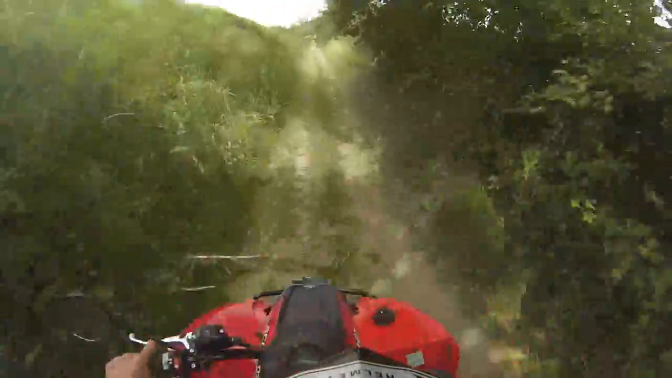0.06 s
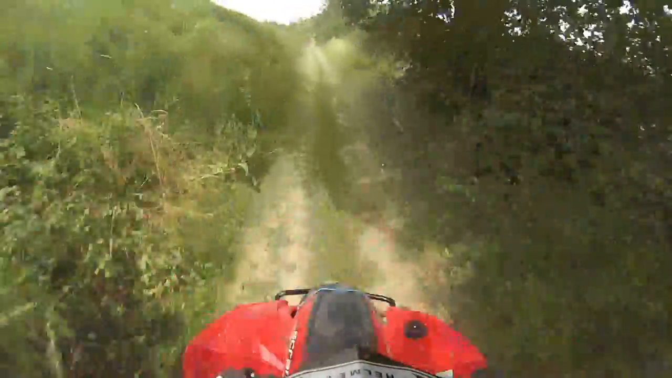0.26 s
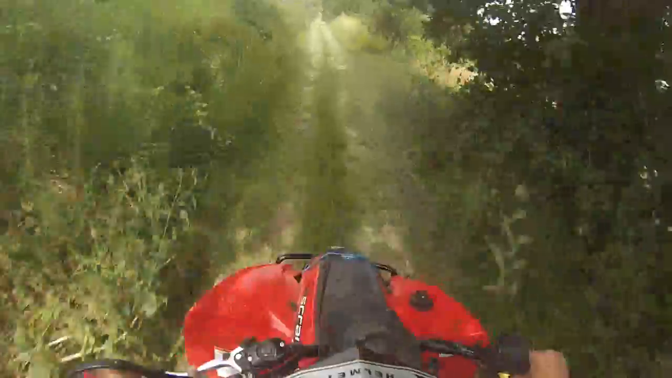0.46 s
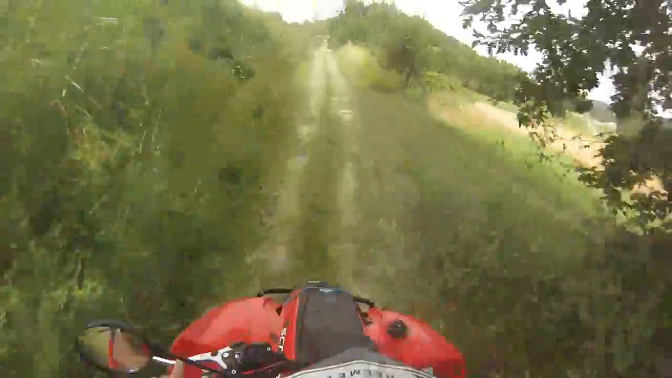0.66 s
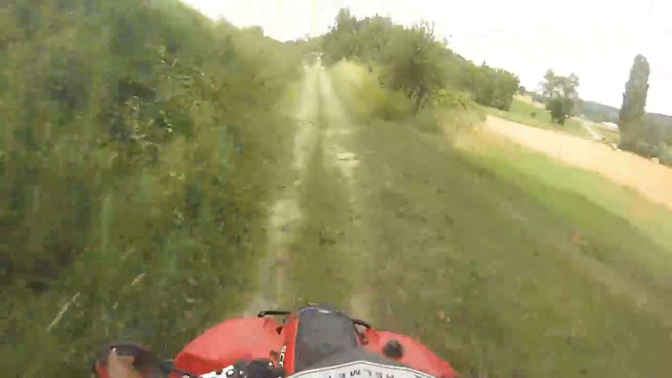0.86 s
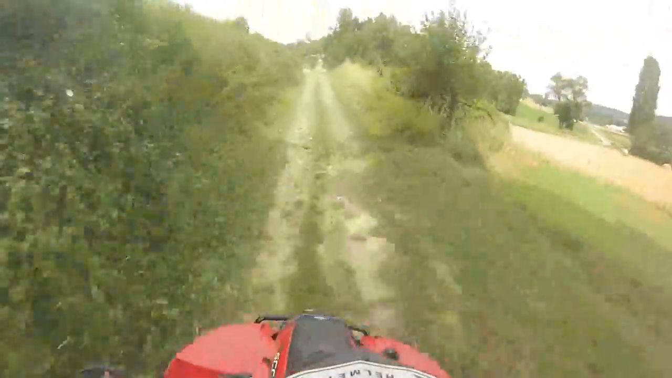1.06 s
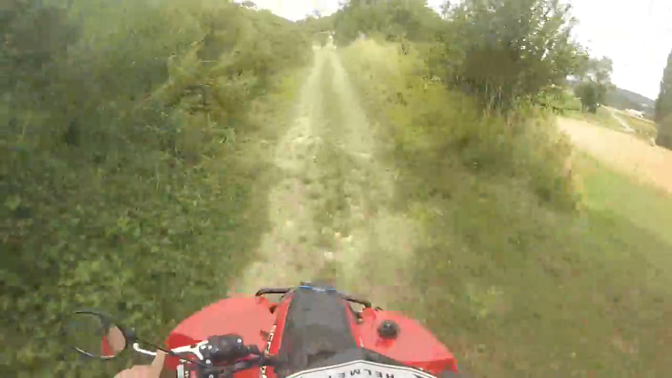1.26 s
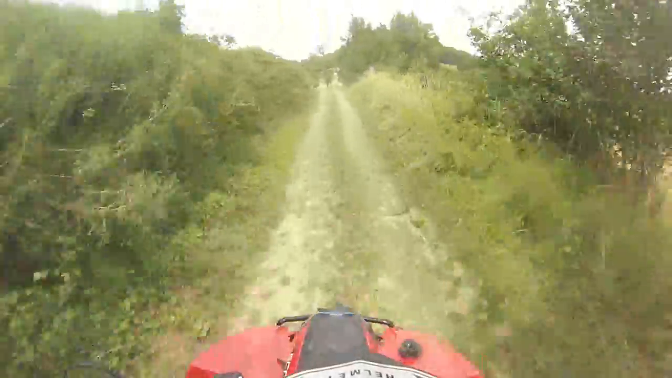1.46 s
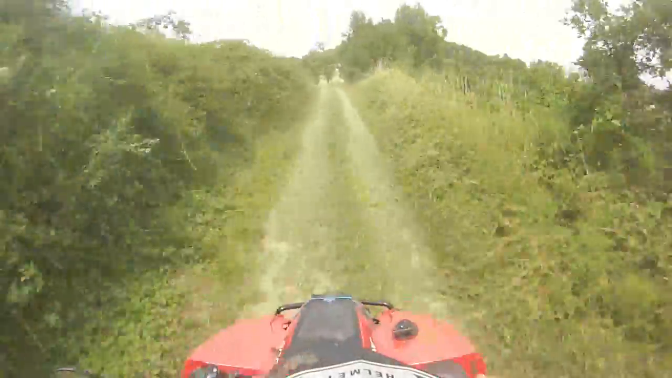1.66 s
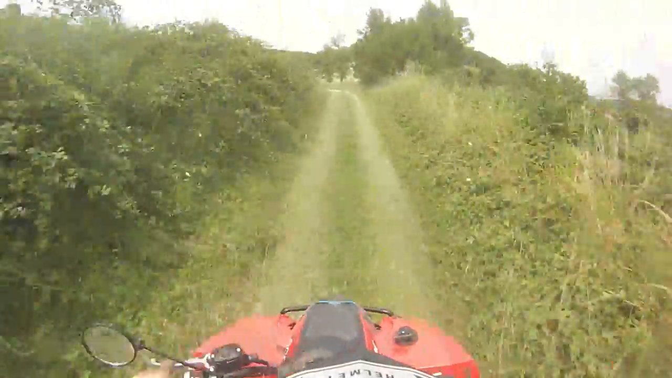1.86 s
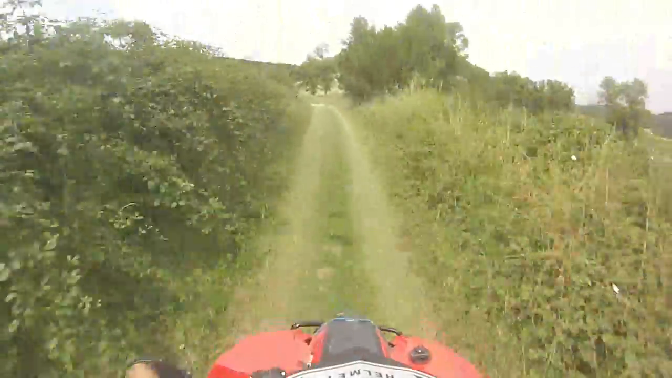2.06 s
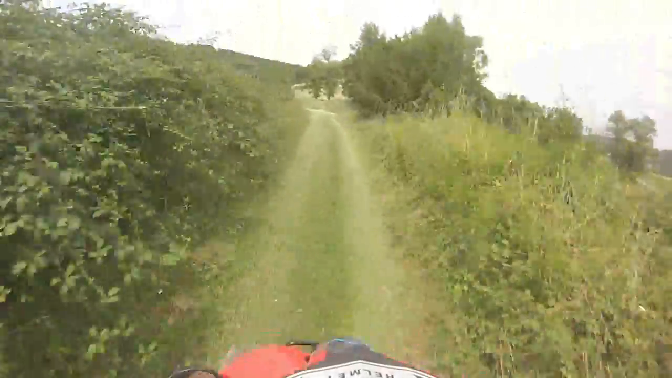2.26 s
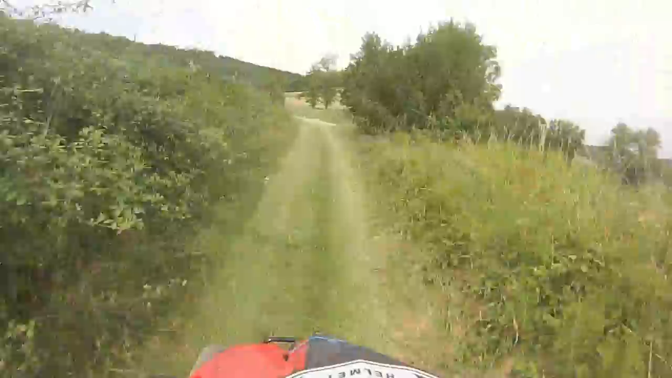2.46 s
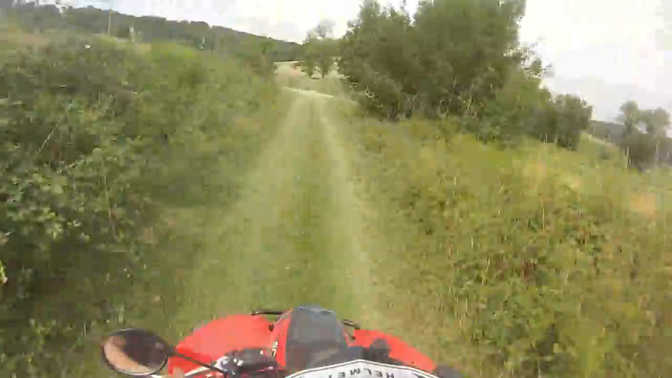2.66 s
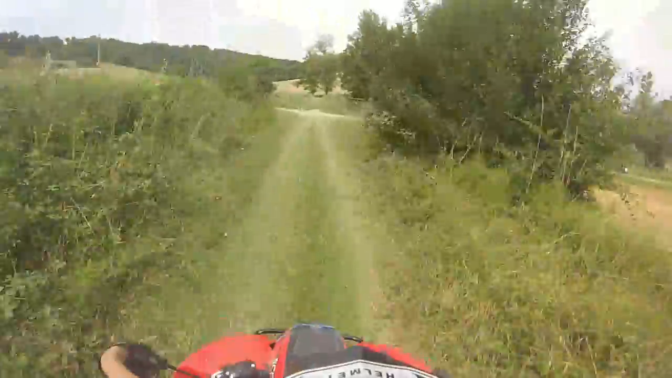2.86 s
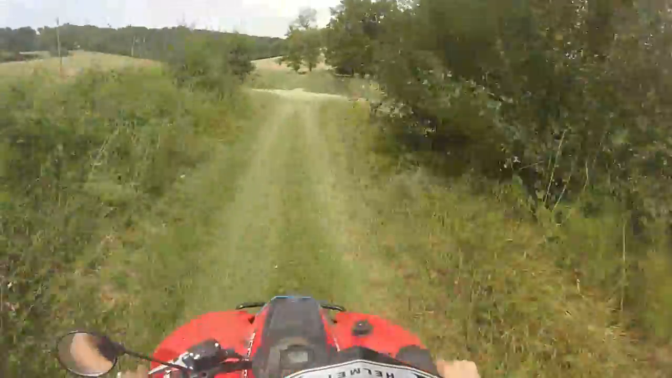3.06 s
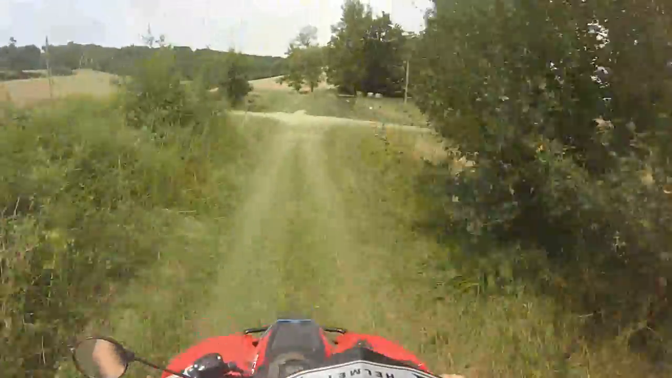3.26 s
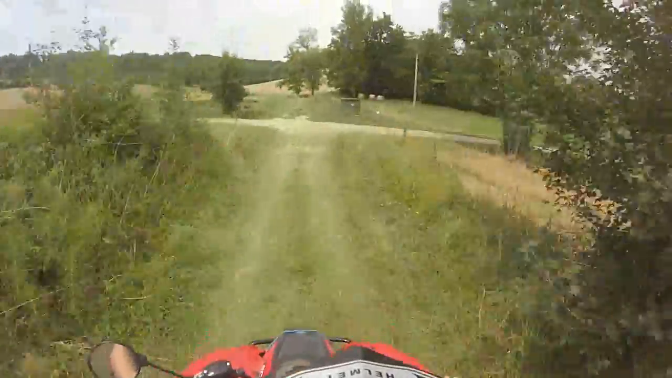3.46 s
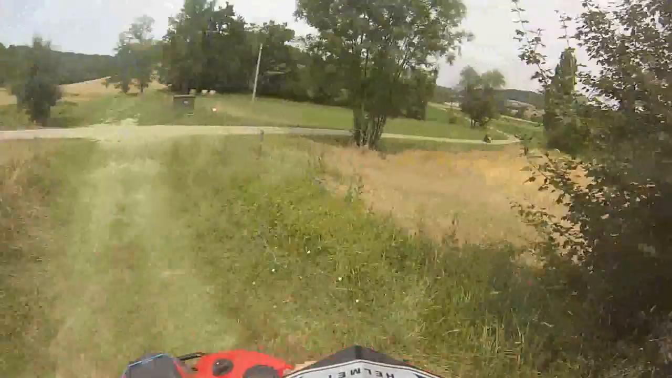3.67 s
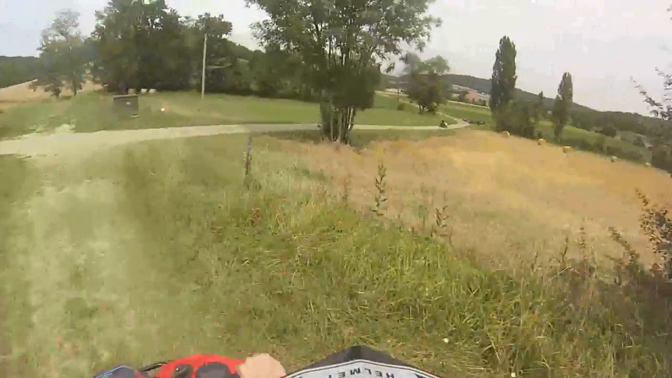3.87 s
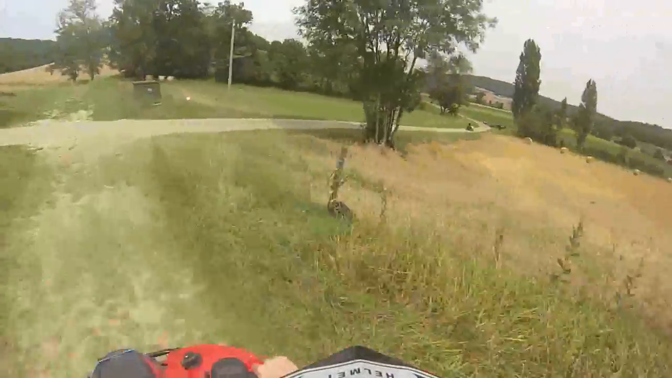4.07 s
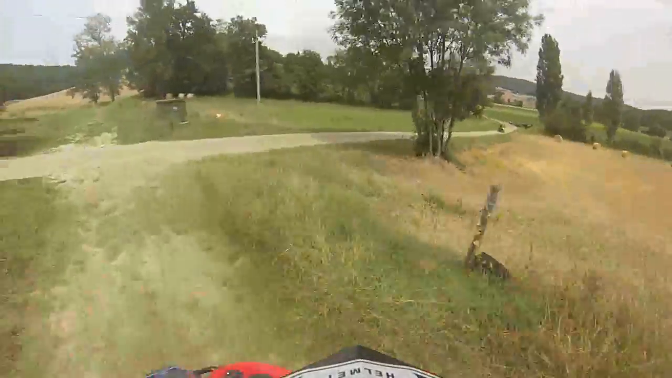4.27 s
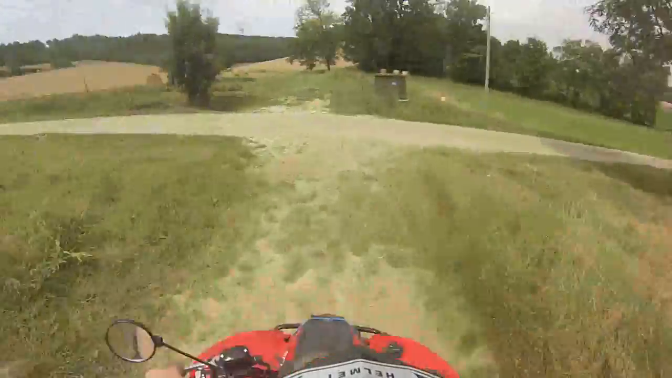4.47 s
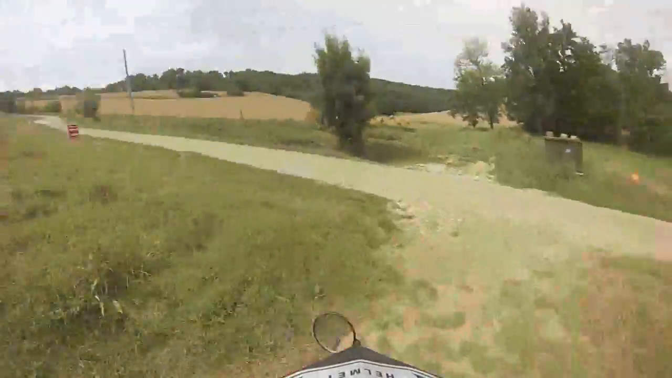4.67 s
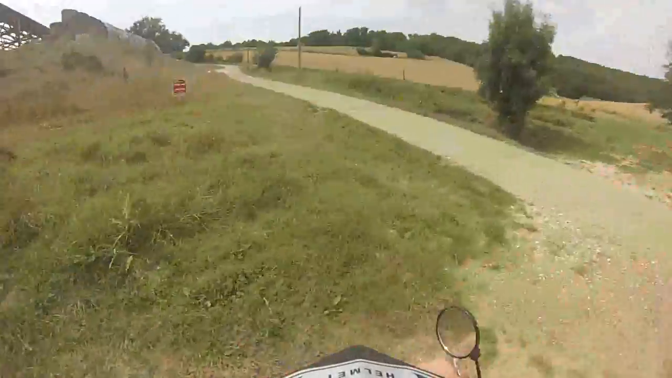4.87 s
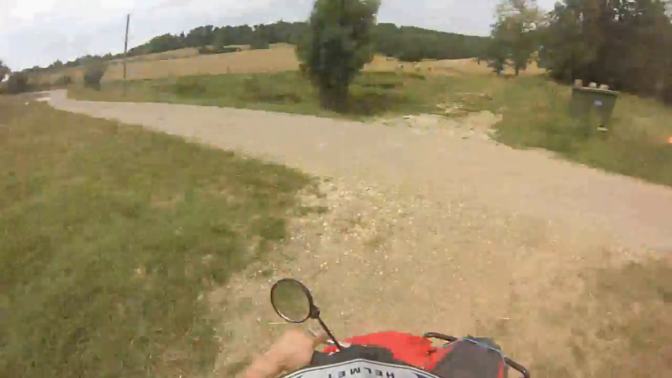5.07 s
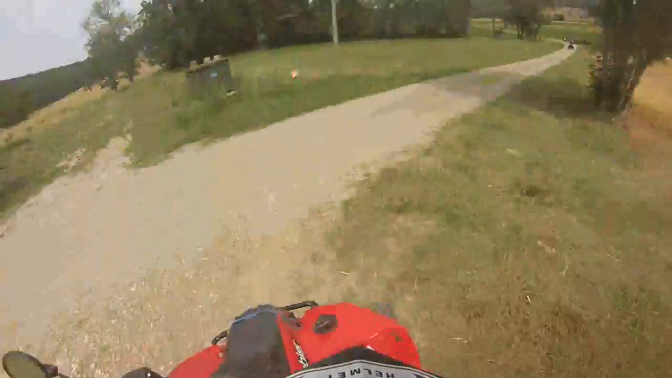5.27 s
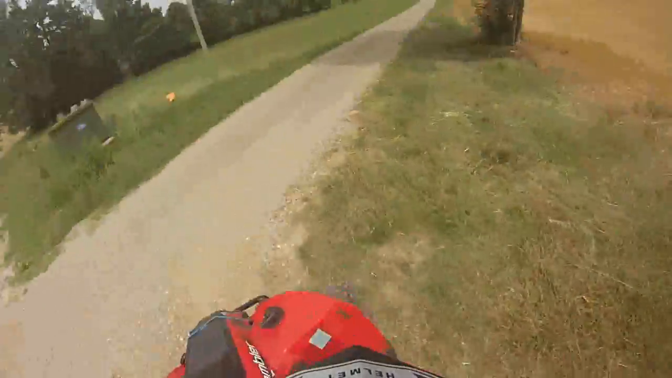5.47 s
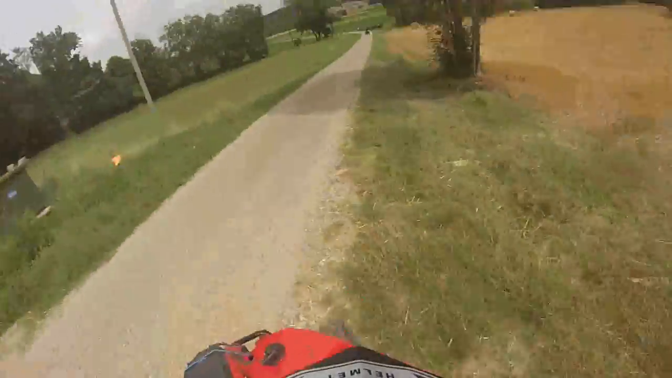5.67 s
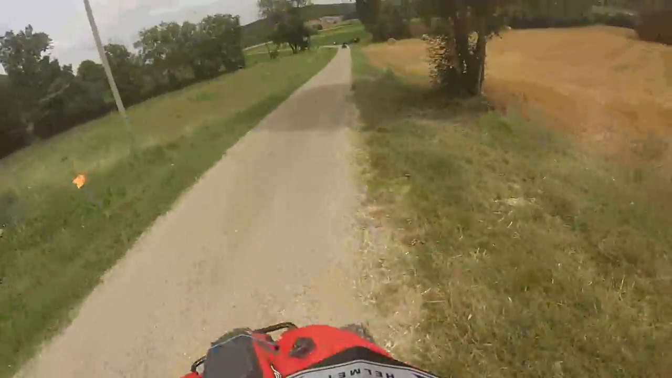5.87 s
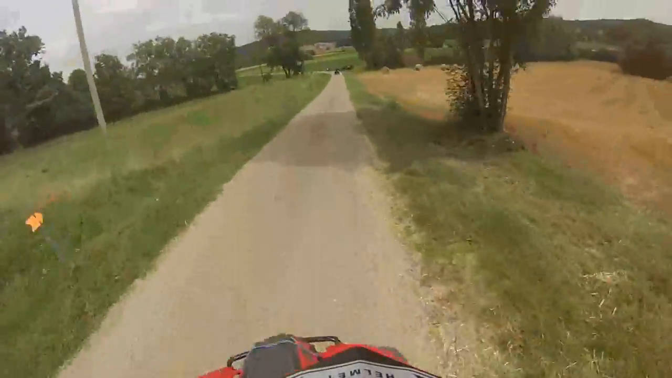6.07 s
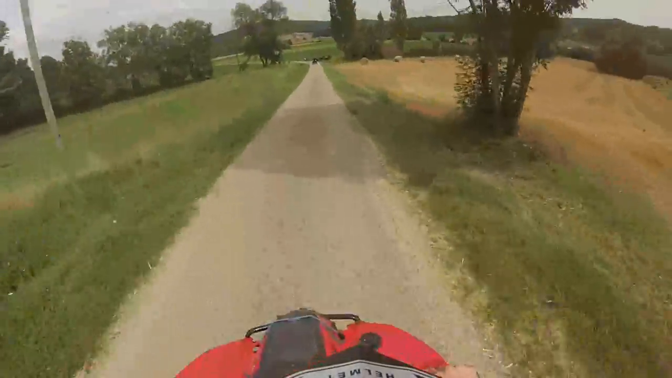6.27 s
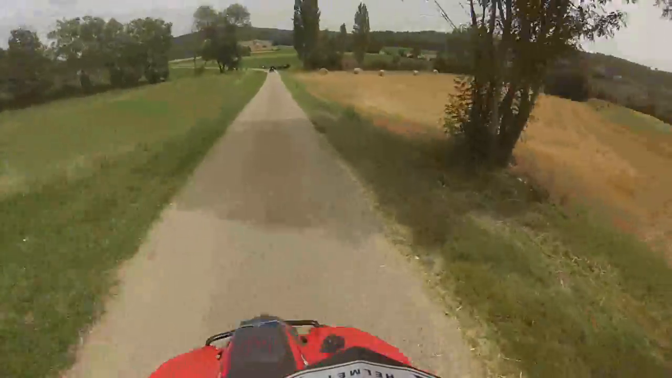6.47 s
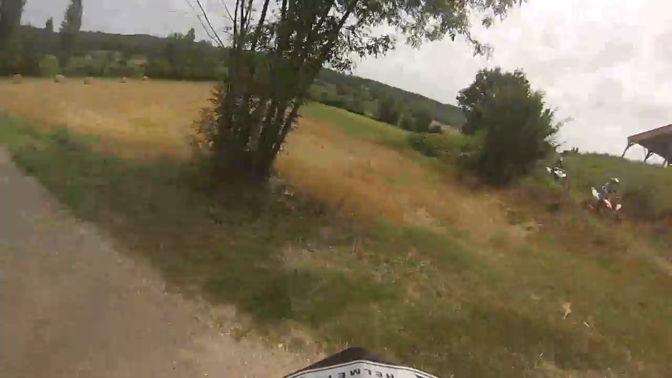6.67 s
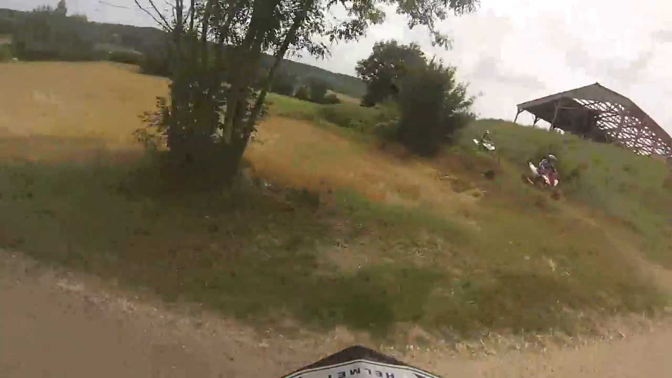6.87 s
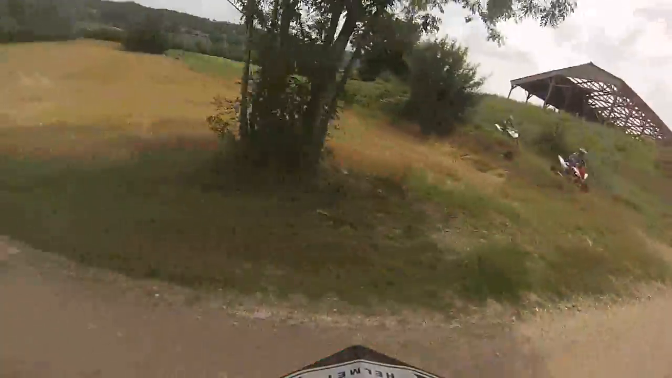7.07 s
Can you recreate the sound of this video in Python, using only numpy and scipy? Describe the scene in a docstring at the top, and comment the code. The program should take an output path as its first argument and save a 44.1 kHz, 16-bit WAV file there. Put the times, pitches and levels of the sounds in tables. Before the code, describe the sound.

A helmet microphone sits close above a single-cylinder four-stroke quad in the open air. From 0 to 1.7 s the engine pulls steadily at high revs: a thick low throb, raspy chuffing, metallic clatter and faint gear whine, over the bright swish of tyres through grass, wind buffets and chassis rumble. From about 1.8 s the revs fall, and by 3 s the rush is softer and duller. It coasts on, the pulses slowing, with dull bumps near 3.8-3.9 s. At 4.64 s one sharp, hard plastic click stands out, followed by low wind thumps and tiny grit ticks. Almost idling at 5.25 s, the engine suddenly barks and the revs climb, with ringing metal, gear growl and pulsing hiss. By 6.2 s it pulls strongly again, a hollow intake honk swelling around 6.4 s, and it holds fairly steady to the end at 7.1 s.

```python
"""Grassy trail and lane, from the helmet of a rider on a single-cylinder four-stroke quad. It pulls along,
coasts down almost to idle at a junction and accelerates onto the lane. Firing orders and chuffs make
the exhaust, blows ringing metal modes the clatter and cover, gear multiples the whine, shaped noise the
tyres, wind and chassis, and filtered impulses the ruts, the grit and one hard click on the camera housing."""
import sys
import numpy as np
from scipy import signal
from scipy.fft import rfft, irfft, next_fast_len
from scipy.io import wavfile
from scipy.ndimage import map_coordinates

SR = 44100
rng = np.random.default_rng(int(sys.argv[2]) if len(sys.argv) > 2 else 0)


def materialize(psi):
    """Save the field psi as 16-bit PCM at rate SR to the path in sys.argv[1].

    A 1-D psi becomes a single channel; in a 2-D psi each row is a channel.
    """
    bounded = np.clip(np.atleast_2d(psi).T, -1, 1)
    quanta = np.round(bounded * 32767).astype(np.int16)
    wavfile.write(sys.argv[1], SR, quanta)


N = 313992

# Rush of the ride. Each row: time in seconds, base treble level in dB.
RUSH_LEVEL = [(0.0, -64), (0.44, -62), (1.23, -62.5), (1.49, -60.5), (2.38, -64.5), (3.01, -71.5),
              (3.19, -75), (3.49, -77.5), (3.96, -84), (4.96, -89.5), (5.28, -85), (5.37, -77),
              (5.51, -75.5), (5.63, -74.5), (5.95, -69), (6.09, -70), (6.74, -71), (7.12, -68.5)]
# Ground under the wheels. Each row: time in seconds, share of bare ground rather than grass (0-1).
BARE_GROUND = [(3.5, 0.02), (5.4, 0.76)]
CRUISE_RATE = 50  # firings per second at cruising speed
METAL_TOP_HZ = 5200  # the engine's metal parts ring little above this


def amp(db):
    """Decibels to gain."""
    return 10 ** (np.asarray(db) / 20)


def unit(x):
    """x at rms 1."""
    return x / np.sqrt(np.mean(x ** 2) + 1e-20)


def curves(rows):
    """One value per sample for each column after the time."""
    s, *cols = np.transpose(rows)
    return [np.interp(np.arange(N) / SR, s, c) for c in cols]


def wobble(rate):
    """A smooth random curve, rate knots a second."""
    knots = rng.standard_normal(int(N * rate / SR) + 4)
    return map_coordinates(knots, [np.arange(N) * rate / SR])


def swells(rows):
    """Decibels gained in bell-shaped (seconds, half length in seconds, dB) swells."""
    t = np.arange(N) / SR
    return sum(db * np.exp(-((t - s) / half) ** 2) for s, half, db in rows)


def noise():
    """White noise."""
    return rng.standard_normal(N)


def blend(a, b, share):
    """Equal-power mix with a share of b."""
    share = np.clip(share, 0, 1)
    return np.sqrt(1 - share) * a + np.sqrt(share) * b


def filtered(x, response):
    """x times a complex response of frequency."""
    m = next_fast_len(N + SR // 2)
    return irfft(rfft(x, m) * response(np.fft.rfftfreq(m, 1 / SR)), m)[:N]


def coloured(x, points):
    """x through a causal filter with the (Hz, dB) shape, at rms 1."""
    size = 16384
    f, db = np.transpose(points)
    hz = np.fft.rfftfreq(size, 1 / SR)
    log_gain = np.log(amp(np.interp(np.log(hz + 1), np.log(f), db)))
    # folding the cepstrum forward in time gives the minimum-phase filter
    cepstrum = irfft(log_gain)[:size // 2]
    cepstrum[1:] *= 2
    impulse_response = irfft(np.exp(rfft(cepstrum, size)))
    return unit(signal.fftconvolve(x, impulse_response)[:N])


def resonances(modes, hz):
    """Complex response of (Hz, width in Hz, dB) modes, alternating in sign."""
    return sum((-1) ** k * amp(db) * 1j * hz * width / (centre * centre - hz * hz + 1j * hz * width)
               for k, (centre, width, db) in enumerate(modes))


def ringing(drive, modes, top_hz):
    """The modes' answer to a drive that is softened above top_hz, at rms 1."""
    return unit(filtered(drive, lambda hz: resonances(modes, hz) / (1 + 1j * hz / top_hz) ** 2))


def rattling(drive, modes):
    """Loose metal: every mode swells and fades on its own, at rms 1."""
    flutter_db, flutter_rate = 3, 18  # depth in dB, knots per second
    parts = (amp(db + flutter_db * wobble(flutter_rate)) * ringing(drive, [(hz, width, 0)], METAL_TOP_HZ)
             for hz, width, db in modes)
    return unit(sum(parts))


def pulses(times, sizes):
    """Impulses placed between samples by a windowed sinc."""
    at = np.clip(np.ravel(times) * SR, 0, N + 1)
    index = at.astype(int)[:, None] + np.arange(-7, 9)
    offset = index - at[:, None]
    taps = np.sinc(offset) * np.sinc(offset / 8) * np.ravel(sizes)[:, None]
    return np.bincount(np.clip(index, 0, N).ravel(), taps.ravel(), N + 1)[:N]


def blows(cycle, angles, scatter_db, jitter):
    """Blows at the same points of every engine cycle, uneven in size and time (jitter in s), at even power."""
    due = np.arange(int(cycle[-1]) + 1)[:, None] + angles
    times = np.interp(due, cycle, np.arange(N) / SR, right=N) + jitter * rng.standard_normal(due.shape)
    signs = rng.choice([-1, 1], len(angles))
    sizes = signs * amp(scatter_db * rng.standard_normal(due.shape))
    # denser blows at high revs are turned down
    return unit(pulses(times, sizes) / np.sqrt(np.gradient(cycle)))


def gas(cycle, depth_db):
    """Noise that swells once in every engine cycle."""
    return unit(noise() * amp(depth_db * np.cos(2 * np.pi * cycle)))


def effort(law, rate, throttle):
    """An engine layer's dB: louder with speed and with throttle."""
    db, per_octave_db, shut_db = law
    return db + per_octave_db * np.log2(rate / CRUISE_RATE) - shut_db * (1 - throttle)


def boom(rate, cycle, throttle, count=20):
    """Firing orders slide through the pipe's fixed tone; its phase lag shapes them into a ringing puff per cycle."""
    # Boom tone under load and coasting. Each row: pitch in Hz, base level in dB of a firing order there.
    pull_tone = [(28, -49), (44, -48.5), (51, -63.5), (70, -49), (90, -48.5), (102, -49), (112, -51.5),
                 (135, -51), (152, -58), (180, -56.5), (200, -61), (222, -69), (237, -54), (253, -53.5),
                 (264, -53.5), (275, -65), (302, -75), (318, -59.5), (355, -64.5), (405, -68), (455, -65),
                 (500, -67.5), (550, -72), (610, -64.5), (650, -69.5), (700, -73), (740, -76), (820, -78.5),
                 (1000, -89)]
    coast_tone = [(30, -67), (55, -63), (75, -61), (90, -59), (105, -48), (118, -47), (131, -51),
                  (140, -62), (150, -73), (170, -76), (400, -76.5), (700, -98)]
    # Turn from coasting to pulling tone. Each row: throttle (0-1), share of the pulling tone (0-1).
    pull_share = [(.5, 0.037), (.85, 0.96)]
    # Coasting, the boom dies away towards idle. Each row: firings per second, dB gained.
    coast_fade = [(19.5, -16.5), (21.2, -11), (22.8, -4.5), (26, -6), (29.5, 0), (40, 5), (44, -0.5)]
    # Ring of the pipe, used for its phase. Each row: pitch in Hz, width in Hz, level in dB.
    pipe_mode = [(129.2, 5.6, 0)]
    # Tone of the pipe's bark, passed twice. Each row: pitch in Hz, width in Hz, level in dB per pass.
    bark_tone = [(133.7, 19, -2)]
    # Uneven firing as the throttle closes. Each row: time in seconds, half length in seconds, added dB of unevenness.
    stumbles = [(1.9, 0.18, 3.5), (2.45, 0.2, 2)]
    # Higher firing orders waver more. Each row: pitch in Hz, depth in dB.
    waver = [(200, 0), (450, 2.2)]
    pull_db_per_octave = 18.5
    smear_hz = 105  # higher orders are delayed more: one radian of lag at this pitch
    # the throttle snaps open and the pipe barks; the level is ahead of the rise and the bark tone
    bark_s, bark_rise_s, bark_db, bark_fade_db_per_s = 5.275, .012, -46, 16

    pull = np.clip(np.interp(throttle, *np.transpose(pull_share)), 0, 1)
    pull_db = pull_db_per_octave * np.log2(rate / CRUISE_RATE)
    idle_db = np.interp(rate, *np.transpose(coast_fade))
    age = np.maximum(np.arange(N) / SR - bark_s, 0)
    bark = amp(bark_db - bark_fade_db_per_s * age) * (1 - np.exp(-age / bark_rise_s))
    unevenness = .25 + .6 * pull + swells(stumbles)
    out = np.zeros(N)
    for k in range(1, count + 1):
        hz = k * rate
        pulling = np.interp(hz, *np.transpose(pull_tone)) + pull_db
        coasting = np.interp(hz, *np.transpose(coast_tone)) + idle_db
        steady = amp(pull * pulling + (1 - pull) * coasting)
        size = np.hypot(steady, bark * np.abs(resonances(bark_tone, hz)) ** 2)
        lag = np.angle(resonances(pipe_mode, hz)) - (hz / smear_hz) ** 2
        uneven_db = unevenness * wobble(22) + np.interp(hz, *np.transpose(waver)) * wobble(9)
        out += size * amp(uneven_db) * np.sqrt(2) * np.cos(2 * np.pi * k * cycle + lag)
    return out


def silencer(hz):
    """Each chamber smears a pulse into echoes without colouring it."""
    # Silencer chambers. Each row: round trip in seconds, reflection (0-1).
    chambers = [(.0023, 0.26), (.0075, 0.6)]
    response = 1
    for trip, reflection in chambers:
        echo = np.exp(-2j * np.pi * hz * trip)
        back = np.clip(reflection, 0, .9)
        response = response * (echo - back) / (1 - back * echo)  # all-pass
    return response


def rasp(cycle, rate, db):
    """Each firing chuffs: an uneven pulse through the silencer and a dying puff of gas, more gas at high revs."""
    # Spectrum of the chuffs. Each row: pitch in Hz, relative level in dB per Hz.
    rasp_tone = [(120, -39.5), (200, 0), (260, 6), (315, 3.5), (360, -0.5), (435, 0), (525, -5.5),
                 (612, -9), (760, -13.5), (1000, -18), (2500, -61)]
    # Chuffs weaken near idle. Each row: firings per second, dB gained.
    chuff_fade = [(19.3, -4), (21, 0.5)]
    puff_s = 0.014  # decay of the gas after each firing
    firing = filtered(blows(cycle, np.zeros(1), scatter_db=1, jitter=.0006), silencer)
    since_firing = (cycle % 1) / rate
    puffs = unit(noise() * np.exp(-since_firing / puff_s))
    idle_db = np.interp(rate, *np.transpose(chuff_fade))
    gassy = np.interp(rate, [25, 45], [.25, .8])
    return amp(db + idle_db) * coloured(blend(firing, puffs, share=gassy), rasp_tone)


def clatter(cycle, throttle, db, fins_db):
    """Valve gear and gear teeth strike all round the cycle; case, gearbox and cooling fins ring along."""
    # Spectrum of the engine body. Each row: pitch in Hz, relative level in dB per Hz.
    engine_tone = [(400, -34.5), (680, -11), (865, -11), (985, -24), (1075, -1.5), (1300, -2.5),
                   (1500, -5.5), (1660, -19), (2170, -19.5), (2330, -4), (2560, -3.5), (2760, -14),
                   (3080, -22), (4100, -24.5), (5500, -67.5)]
    # Modes of case, gearbox growl and fins. Each row: pitch in Hz, width in Hz, relative level in dB.
    case_modes = [(2006, 43, -5), (2983, 37, 2.5), (3273, 33, 3), (3344, 85, 1), (4184, 83, -2.5)]
    growl_modes = [(1115, 58, 1.5), (1298, 102, 3.5), (1350, 50, -2.5)]
    fin_modes = [(2375, 28, 0), (2450, 44, 3), (2546, 60, -2.5)]
    # The case buzzes under load, the gears growl as they take up load, the fins rattle in bursts.
    # Each row: time in seconds, half length in seconds, dB gained.
    buzzes = [(5.6, .2, -1), (6.25, 0.31, 2.5), (6.72, 0.18, 3)]
    growls = [(.25, 0.027, 9), (5.52, 0.056, 9.5), (6.12, 0.17, 10), (6.57, 0.026, 11.5),
              (6.92, 0.21, 11.5)]
    rattles = [(.08, 0.038, 6), (.43, 0.11, 4), (1.19, 0.024, 11.5), (1.68, 0.069, 3), (3.64, 0.038, 16.5),
               (5.33, 0.037, 2), (5.52, 0.08, 5), (5.78, 0.07, 8.5), (5.93, 0.058, 3), (6.16, 0.063, 1),
               (6.75, 0.23, -14)]
    case_db, growl_db = -12, -8.5  # against the engine body, before the swells
    teeth = blows(cycle, rng.random(size=32), scatter_db=4.0, jitter=.00004)
    strikes = blend(teeth, gas(cycle, depth_db=1.5), share=.7 - .42 * throttle)
    body = coloured(strikes, engine_tone)
    case = amp(case_db + swells(buzzes)) * rattling(strikes, case_modes)
    growl = amp(growl_db + swells(growls)) * ringing(strikes, growl_modes, METAL_TOP_HZ)
    fins = amp(fins_db + swells(rattles)) * rattling(strikes, fin_modes)
    return amp(db + 0.78 * wobble(8)) * (body + case + growl) + fins


def cover(cycle, db):
    """Each firing knocks a thin cover, which sings out when a multiple of the firing rate meets its pitch."""
    # Ring of the cover. Each row: pitch in Hz, width in Hz, relative level in dB.
    cover_mode = [(1398.4, 19, 0)]
    # The ring surges. Each row: time in seconds, half length in seconds, dB gained.
    surges = [(.11, 0.026, 4), (.45, 0.044, 2), (1.6, 0.33, 7.5), (5.02, 0.032, 11), (5.47, 0.035, 7),
              (5.58, 0.089, 9.5), (5.72, 0.045, 11), (5.86, 0.021, 7.5), (6.018, .008, 4),
              (6.04, 0.14, 12.5), (6.35, 0.12, 4.5), (6.8, .16, -1), (7.09, 0.079, 7)]
    knock = blows(cycle, np.zeros(1), scatter_db=1.8, jitter=.00007)
    drive = blend(knock, noise(), share=.3)
    return amp(db + swells(surges)) * ringing(drive, cover_mode, METAL_TOP_HZ)


def whine(rate, cycle, db):
    """Meshing gears sing on high multiples of the firing rate; backlash roughens each in strength and phase."""
    # Gear whines. Each row: multiple of the firing rate, relative level in dB ahead of the gearbox.
    gear_multiples = [(19, -6.5), (22, -4.5), (23, -9), (24, 0), (25, -7), (26, -7), (27, -8), (28, -2.5),
                      (29, -7), (30, -14), (31, -9), (33, -4.5), (34, -3)]
    # The gearbox lifts passing whines. Each row: pitch in Hz, width in Hz, level in dB of the added ring.
    gearbox_modes = [(860, 17, 11), (1030, 16, -7)]
    out = np.zeros(N)
    for k, level_db in gear_multiples:
        multiple = round(k)
        lift = 1 + np.abs(resonances(gearbox_modes, multiple * rate))
        backlash = .4 * wobble(45)  # radians
        out += lift * amp(level_db + 1.5 * wobble(7)) * np.sin(2 * np.pi * multiple * cycle + backlash)
    return amp(db) * out


def rush(cycle):
    """Tyres swish through grass, duller as they slow; on bare ground they yield to the engine's pulsing hiss."""
    # Spectra of the grass swish and the hiss. Each row: pitch in Hz, relative level in dB per Hz.
    grass_tone = [(150, -22), (400, 8.5), (800, 3.5), (950, 7), (1150, 11), (1450, 12.5), (1700, 9.5),
                  (1930, 5.5), (2300, 12), (2600, 9.5), (2760, 4), (3120, 0.5), (3340, 3.5), (3560, -.5),
                  (4600, -5), (7000, -4), (8700, -16.5), (10700, -12.5), (14500, -30)]
    hiss_tone = [(1800, 4), (2600, 14.5), (3100, 10), (3370, 5.5), (3750, 4.5), (4300, 9), (4720, 1),
                 (5050, 1.5), (6200, 1.5), (7400, 3.5), (8500, -10.5), (9900, -8.5), (12500, -12),
                 (13500, -50), (15000, -62)]
    # Tall grass brushes the quad. Each row: time in seconds, half length in seconds, dB gained.
    brushes = [(2.95, 0.079, 1), (3.68, 0.085, 2.5)]
    # below this pitch the tyres win back this many dB per dB of lost rush
    dull_hz, dull_grows = 2170, 0.31
    db, = curves(RUSH_LEVEL)
    bare, = curves(BARE_GROUND)
    grass = coloured(noise(), grass_tone)
    low = filtered(grass, lambda hz: 1 / (1 + (hz / dull_hz) ** 4))
    grass = grass + (amp(dull_grows * (db.max() - db)) - 1) * low
    tyres = amp(12.0 + swells(brushes) + 0.41 * wobble(39.94)) * grass
    hiss = amp(4.5) * coloured(gas(cycle, depth_db=3.5), hiss_tone)
    return amp(db) * blend(tyres, hiss, share=bare)


def ride():
    """Wind on the microphone and the chassis rumbling over bumps; both grow with the pace."""
    # Spectra of wind and chassis. Each row: pitch in Hz, relative level in dB per Hz.
    buffet_tone = [(8, -10.5), (20, -2.5), (34, -7), (46, -9), (62, -22), (110, -32.5), (300, -76)]
    chassis_tone = [(40, -35), (70, -7.5), (125, 0.5), (172, 1), (215, -9), (270, -11), (450, -32.5),
                    (1000, -70.5)]
    # Gusts on the microphone, and rough patches that shake the chassis.
    # Each row: time in seconds, half length in seconds, dB gained.
    gusts = [(.29, 0.097, 13.5), (.47, 0.037, 10), (1.8, 0.22, 2), (2.3, 0.07, 5), (4.82, 0.071, 13.5),
             (4.95, 0.063, 11), (5.53, 0.052, 6.5)]
    jolts = [(.6, 0.084, 7), (1.44, 0.13, 6), (1.85, 0.25, 6), (2.68, 0.15, 3.5), (6.37, 0.11, 4),
             (7.04, 0.35, 8)]
    # base dB at full pace, and dB per dB of rush
    wind_base_db, wind_grows = -55, 0.085
    chassis_base_db, chassis_grows = -54, 0.27
    smooth_ground_db = -6.5  # chassis change on fully bare ground
    rush_db, = curves(RUSH_LEVEL)
    bare, = curves(BARE_GROUND)
    pace_db = rush_db - rush_db.max()
    wind_db = wind_base_db + wind_grows * pace_db + swells(gusts) + wobble(7.7)
    chassis_db = chassis_base_db + chassis_grows * pace_db + smooth_ground_db * bare + swells(jolts)
    wind = amp(wind_db) * coloured(noise(), buffet_tone)
    return wind + amp(chassis_db) * coloured(noise(), chassis_tone)


def microphone_hiss():
    """The microphone's steady noise floor, shaped from white noise."""
    # Spectrum of the hiss. Each row: pitch in Hz, relative level in dB per Hz.
    floor_tone = [(1000, -4), (9000, -4), (12500, -6.5), (14000, -33)]
    return amp(-85) * coloured(noise(), floor_tone)


def struck(contacts, modes, low_hz):
    """Contacts ring the modes, soft ones only the lower; a small body radiates little below low_hz."""
    radiation = signal.butter(2, low_hz, "high", fs=SR, output="sos")
    out = np.zeros(N)
    for s, db, top_hz in contacts:
        ring = signal.sosfilt(radiation, ringing(pulses([s], [1]), modes, top_hz))
        out += amp(db) * ring / np.abs(ring).max()
    return out


def knocks():
    """Ruts jolt the rack, a hard contact bounces once on the plastic housing and grit ticks faintly."""
    # Wheels dropping into ruts, contacts on the camera housing, grit against the bodywork.
    # Each row: time in seconds, peak in dB (the housing gets 0.5 dB more), brightness in Hz.
    bumps = [(3.825, -49, 200), (3.915, -53.5, 170), (4.703, -57, 900)]
    clicks = [(4.6355, -21.5, 16000), (4.6363, -29, 9000)]
    ticks = [(4.7765, -68, 6000), (5.1525, -67, 9000), (5.156, -65, 9000)]
    # What rings: front rack, camera housing, grit. Each row: pitch in Hz, width in Hz, relative level in dB.
    rack_modes = [(224, 15, 7.5), (338, 35, -5), (422, 25, 3), (630, 40, 0)]
    housing_modes = [(1420, 150, -6), (2370, 130, 7.5), (3065, 160, 12.5), (3290, 137, 13.5),
                     (3680, 90, 3.5), (4040, 130, -2), (4530, 200, -6), (5040, 140, -11), (5750, 660, -8.5),
                     (7630, 260, -8.5), (9300, 800, -8), (10250, 420, -5.5), (11400, 630, -12)]
    grit_modes = [(5540, 190, -2), (7500, 150, 0), (8130, 190, 0), (9250, 250, -6)]
    rack = struck(bumps, rack_modes, low_hz=200)
    housing = amp(0.5) * struck(clicks, housing_modes, low_hz=1870)
    grit = struck(ticks, grit_modes, low_hz=4000)
    return rack + housing + grit


def intake(cycle):
    """Gulps of air, one per cycle, sound the airbox."""
    # Airbox resonance, passed twice. Each row: pitch in Hz, width in Hz per pass, relative level in dB.
    airbox_mode = [(391, 110, 0)]
    # The airbox honks as the revs peak. Each row: time in seconds, half length in seconds, dB gained.
    honks = [(6.39, 0.34, 32)]
    rest_db = -88
    gulps = blend(blows(cycle, np.full(1, .5), scatter_db=2, jitter=.0006), noise(), share=.6)
    honk = unit(filtered(gulps, lambda hz: resonances(airbox_mode, hz) ** 2))
    return amp(rest_db + swells(honks)) * honk


def scene():
    """All engine sounds follow one crankshaft and one throttle."""
    # Engine speed. Each row: time in seconds, firings per second.
    speed = [(0, 47), (.13, 47.7), (.27, 49.12), (.43, 49.8), (.92, 51.32), (1.15, 50.3), (1.3, 50),
             (1.58, 51.8), (1.8, 47.92), (1.98, 44.4), (2.1, 40.1), (2.42, 33.3), (2.88, 29.58),
             (3.15, 28.48), (3.55, 26.38), (4.15, 24.9), (4.8, 21.47), (5.25, 19.2), (5.29, 24.8),
             (5.5, 30.05), (5.7, 34.6), (5.9, 40.72), (6.08, 44.82), (6.25, 46.76), (6.4, 45.72),
             (6.55, 44.72), (6.8, 44.9), (7.12, 45.56)]
    # Throttle. Each row: time in seconds, opening (0-1).
    throttle_moves = [(0, 0.81), (.6, 0.93), (1.1, 0.79), (1.6, 0.83), (2.05, 0.56), (2.75, 0.5),
                      (3.05, 0.52), (3.35, 0.4), (4.2, 0), (5.26, 0), (5.36, 0.82), (5.6, 0.83),
                      (6.1, 0.93), (6.6, 0.82), (7.12, 0.79)]
    # Loudness of each engine layer: base dB at cruising speed and full throttle,
    # dB per octave of speed, dB lost with the throttle shut.
    rasp_law = (-63, 5, 0.49)
    clatter_law = (-55, 10.9, 6.8)
    fins_law = (-59, 11, 13)
    ring_law = (-58.5, 10.2, 11)
    whine_law = (-71, 13, 8.7)
    first_angle = .2  # where the crank starts, as a share of a cycle

    rate, = curves(speed)
    throttle, = curves(throttle_moves)
    cycle = first_angle + np.cumsum(rate) / SR
    laws = rasp_law, clatter_law, fins_law, ring_law, whine_law
    rasp_db, clatter_db, fins_db, ring_db, whine_db = (effort(law, rate, throttle) for law in laws)
    exhaust = boom(rate, cycle, throttle) + rasp(cycle, rate, rasp_db)
    metal = clatter(cycle, throttle, clatter_db, fins_db) + cover(cycle, ring_db) + whine(rate, cycle, whine_db)
    surroundings = rush(cycle) + ride() + microphone_hiss() + knocks()
    return (exhaust + metal + surroundings + intake(cycle))[None]


def record(dry):
    """The camera keeps nothing above its band limit."""
    top_hz = 15250
    return filtered(dry[0], lambda hz: hz < top_hz)[None]


dry = scene()
out = record(dry)
materialize(out)
```